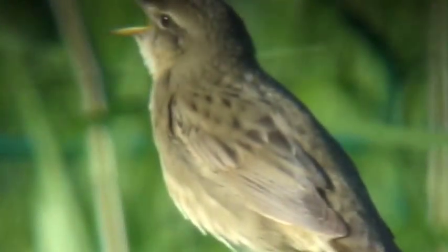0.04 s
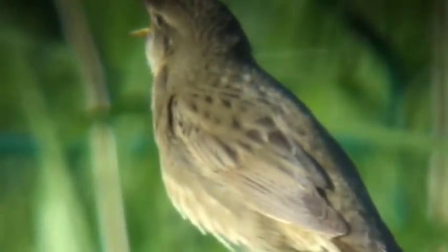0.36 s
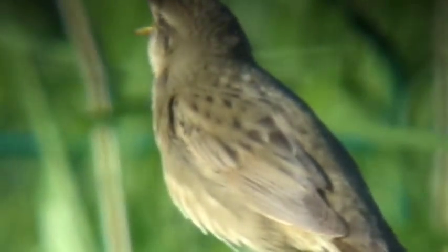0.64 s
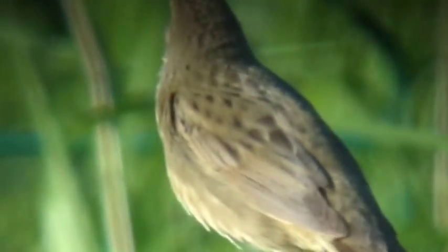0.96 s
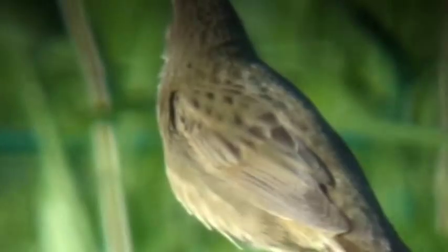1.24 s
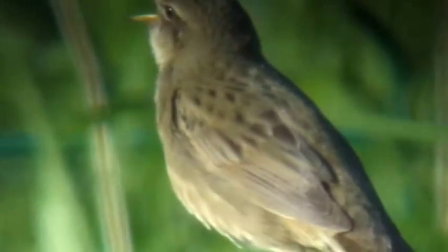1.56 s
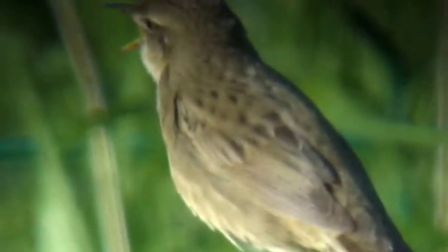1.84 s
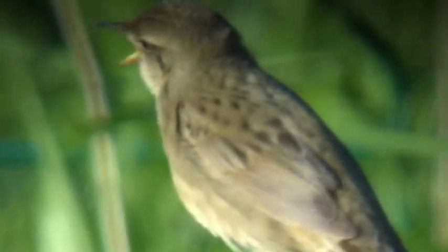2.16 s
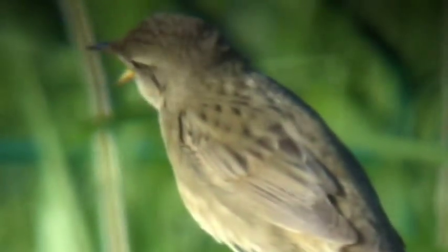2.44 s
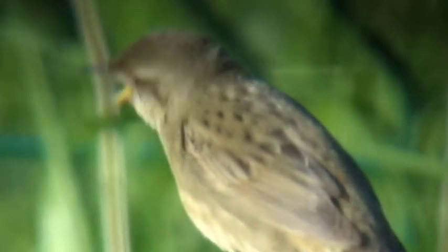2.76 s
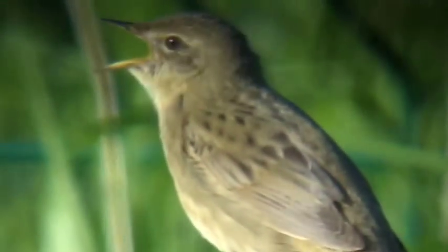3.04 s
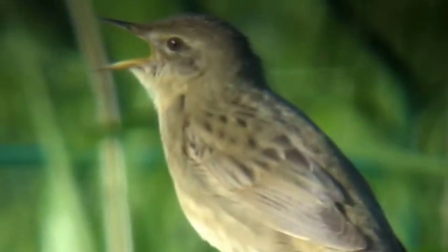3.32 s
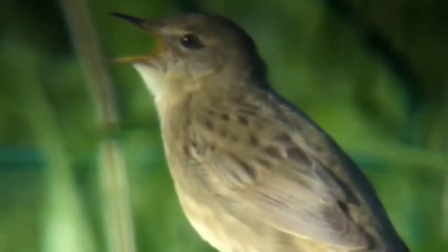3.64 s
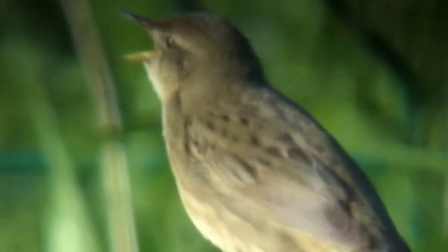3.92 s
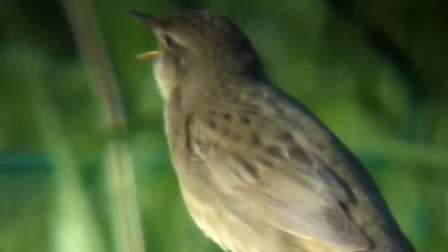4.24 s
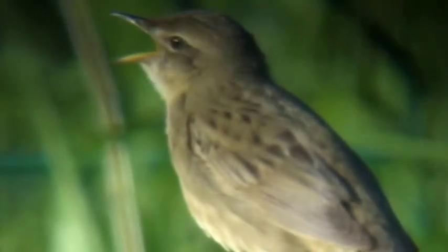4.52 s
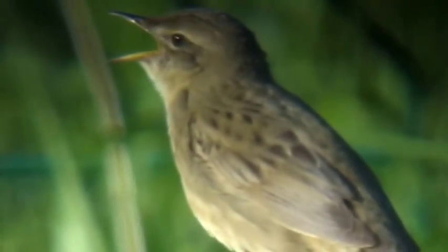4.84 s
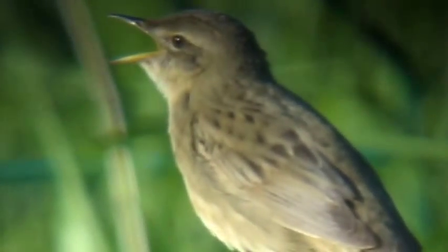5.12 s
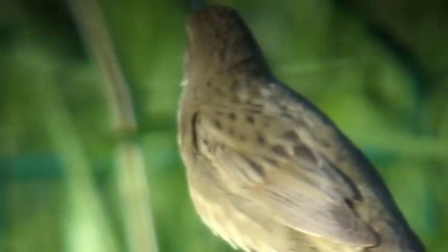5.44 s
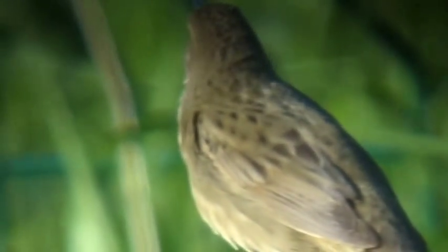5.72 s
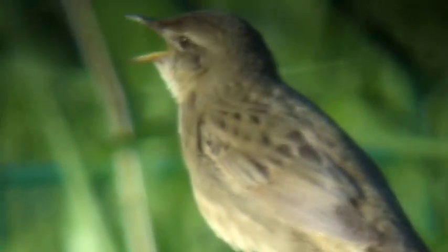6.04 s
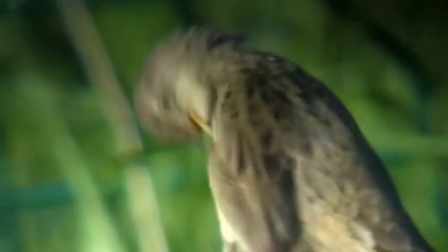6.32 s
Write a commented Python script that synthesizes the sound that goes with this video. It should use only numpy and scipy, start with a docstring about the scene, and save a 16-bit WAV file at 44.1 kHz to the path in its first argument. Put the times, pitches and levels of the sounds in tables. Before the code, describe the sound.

Outdoors among reeds, a nearby small bird keeps up a rapid, high ticking trill, much like an insect. Other birds add faint distant whistles and, about halfway, a brief buzzing call with a sharp chip. One small click sounds near the microphone, and a quiet twitter follows. The trill ends just before a last falling buzz, all over a soft distant rush and faint camera hum.

```python
"""In a reed bed, a grasshopper warbler sings a fast, even trill called a reel: 27 syllables a second.
Its voice box makes each one as a sharp upward tick and a short falling note, and the stems echo them.
Farther off, other small birds whistle, twitter and buzz, and something clicks once near the microphone.
Under it all lie a distant outdoor rush and a camera's low drone, hiss and faint whine."""
import sys
import numpy as np
from scipy import signal
from scipy.fft import rfft, irfft
from scipy.io import wavfile
from scipy.ndimage import uniform_filter1d

SR = 44100
rng = np.random.default_rng(int(sys.argv[2]) if len(sys.argv) > 2 else 0)


def master(y):
    """Save y as 16-bit WAV."""
    cut = np.clip(np.atleast_2d(y).T, -1, 1)
    pcm = np.round(cut * 32767)  # scale
    wavfile.write(sys.argv[1], SR, pcm.astype(np.int16))


N = 290178
TIME = np.arange(N) / SR

# how strong each background noise is, from low to high: frequency_hz, relative_db
RUSH_SPECTRUM = [(30, -40), (200, -14.5), (450, -3), (750, -1), (960, 2), (1200, -2), (1650, -3.5),
                 (2300, -11.5), (4000, -18.5), (7000, -17.5), (16000, -42)]
RUMBLE_SPECTRUM = [(20, -24), (35, -19), (50, -5.5), (63, 1), (83, -2.5), (140, -1), (170, -5),
                   (195, -12.5), (400, -10.5), (900, -66)]
DRONE_SPECTRUM = [(170, -37), (205, -19), (238, -5), (272, 2), (305, -4.5), (338, -19), (390, -13),
                  (440, -29), (700, -52.5)]
HISS_SPECTRUM = [(1000, 0), (5000, -7.5), (9000, 1), (11000, 5.5), (12500, 9.5), (14000, 2), (16000, 4)]
# how the rush swells and sinks: time_s, level_db
RUSH_SWELL = [(0, -58), (1.3, -58), (2.2, -58.5), (3.2, -59), (4.3, -57), (5.1, -59), (6.58, -59)]
# random unevenness in the loudness of the low drone: time_s, level_db
DRONE_FLUTTER = [(0.0, -53), (0.52, -48.5), (0.8, -56.5), (1.22, -48.5), (1.41, -55.5), (1.55, -47),
                 (2.21, -47.5), (2.26, -52), (3.15, -49.5), (3.2, -54.0), (4.89, -50), (5.31, -54),
                 (5.5, -50), (5.73, -57.0), (5.97, -51.0), (6.58, -55)]
# the thin, steady tones of the camera's electronics: pitch_hz, level_db
WHINE_TONES = [(10000, -88), (11000, -84), (11900, -83), (12000, -78), (12100, -84), (13000, -80),
               (13100, -87), (14000, -87)]

# the warbler's pace, steady but for slight hesitations: time_s, syllables_so_far
REEL_PACE = [(0.0023, 0), (1.18, 32), (1.3299, 36), (1.6236, 44), (2.2902, 62), (3.0351, 82), (3.7734, 102),
             (3.8133, 103), (4.3751, 118), (5.1142, 138), (5.3431, 144), (6.1295, 165), (6.2472, 168)]
# how strongly it sings: time_s, level_db
REEL_EFFORT = [(0, -38), (.35, -38.5), (1.25, -35), (2.1, -38), (2.75, -40), (3.1, -39), (3.95, -41.5),
               (4.5, -41), (4.95, -37), (5.3, -39.5), (5.9, -36), (6.25, -42)]
# its overtone (twice the pitch), stronger as the bill opens: time_s, relative_db
REEL_OVERTONE = [(0.0, -22), (0.48, -32.0), (0.78, -25), (2.7, -24), (3.15, -18), (4.56, -29), (5.34, -18),
                 (5.64, -34.0), (6.25, -15.5)]
# the two parts of a syllable: time_from_beat_ms, pitch_hz, relative_db
TICK_SHAPE = [(-1.74, 3850, -26), (-0.92, 4700, -5.5), (-0.86, 6170, 0), (-0.35, 6540, 2), (0.64, 7090, -3),
              (0.92, 8800, -27)]
NOTE_SHAPE = [(9.3, 6140, -24), (10.4, 6040, 1.2), (13.4, 5860, .1), (15.1, 5580, -13)]
# echoes from stems and ground: delay_ms, left_db, right_db
STEM_ECHOES = [(1.257, -20, -14), (5.27, -9.5, -27), (6.25, -32, -16), (31.5, -48, -47)]

# notes of the far whistles and of a twittering bird: start_s, length_s, top_pitch_hz, level_db, shape
WHISTLE_NOTES = [(.24, 0.1, 4350, -67.5, "fall"), (.63, .07, 4240, -74, "fall"),
                 (.875, .135, 3550, -68, "arch"), (1.235, .027, 3600, -74, "fall"),
                 (2.32, .038, 3080, -69, "fall"), (2.65, .12, 4000, -72, "fall"),
                 (2.9, .12, 4000, -72, "fall"), (3.19, 0.1, 3870, -71, "fall"),
                 (3.99, .13, 3990, -72, "fall"), (4.26, .14, 4030, -71, "fall"),
                 (4.51, 0.11, 4080, -69, "fall"), (4.81, 0.09, 4030, -72, "fall")]
TWITTER_NOTES = [(3.378, .047, 2870, -55.5, "rise"), (3.478, .058, 2870, -55, "rise"),
                 (4.793, 0.038, 3010, -63, "arch"), (4.873, 0.042, 3060, -67, "arch"),
                 (4.988, .04, 3120, -67, "arch"), (5.06, 0.032, 3000, -62, "arch"),
                 (5.143, 0.048, 3160, -60.5, "arch"), (5.232, 0.06, 3040, -61, "arch"),
                 (5.336, .06, 2920, -57.5, "arch"), (5.398, 0.049, 2930, -55, "arch"),
                 (5.476, 0.058, 2910, -55.5, "arch"), (5.534, 0.049, 2840, -54, "arch"),
                 (5.603, .1, 2930, -57.5, "double"), (5.734, 0.088, 2950, -54.5, "double"),
                 (5.847, 0.086, 2970, -52, "double"), (5.962, .088, 3020, -53, "double"),
                 (6.077, 0.092, 2970, -53, "double"), (6.192, .088, 3030, -53, "double")]
# buzzing calls (a negative fade grows louder): start_s, length_s, first_pitch_hz, last_pitch_hz,
# level_db, fade_db_per_s, warble_share_of_pitch, first_overtone_db, last_overtone_db
BUZZ_CALLS = [(3.59, .144, 3520, 3490, -37, 22, .07, -32, -32),
              (3.8555, .074, 2760, 2580, -57, -195, .14, 21, -20),
              (6.3215, .198, 4380, 3170, -35.5, 50, .15, -35, -35)]
# one sharp chip from another small bird: start_s, length_s, peak_time_s
CHIP_TIMING = (3.777, .058, 3.8045)

# the two knocks that make the click: start_s, level_db, hardness_db
CLICK_CONTACTS = [(4.5825, -33.5, -4), (4.5836, -30, 3)]
# the tones they set ringing (ring_s is the time to fade by 60 dB): pitch_hz, relative_db, ring_s
CLICK_TONES = [(932, -4, 0.033), (1040, -5.5, 0.026), (1013, -16, 0.11), (1455, -6.5, 0.014),
               (1970, -9, 0.0095), (2350, -8, 0.033), (3220, -21, 0.0063)]


def from_db(db):
    """Turn decibels into a number to multiply a sound by."""
    return 10 ** (np.asarray(db) / 20)


def add(out, start_s, sound):
    """Mix a short sound into a track, dropping whatever sticks out past the ends."""
    at = round(start_s * SR) + np.arange(len(sound))
    inside = (at >= 0) & (at < N)
    out[at[inside]] += sound[inside]


def noise(spectrum, likeness):
    """Stereo noise shaped by a spectrum; a likeness of 1 makes left and right the same."""
    hz, db = np.transpose(spectrum)
    gain = from_db(np.interp(np.log(np.fft.rfftfreq(N, 1 / SR) + 1), np.log(hz), db))
    middle, side = irfft(rfft(rng.standard_normal((2, N))) * gain, N)
    both = np.sqrt(1 + likeness) * middle + np.sqrt(1 - likeness) * np.array([side, -side])
    return both / both.std()


def outdoor_rush():
    """A wide, distant rush that swells gently, a little to the right."""
    swell = from_db(np.interp(TIME, *np.transpose(RUSH_SWELL)) + 3.5)
    return swell * noise(RUSH_SPECTRUM, likeness=.31) * from_db([[-2], [2]])


def camera_noise():
    """The camera rumbles, drones and hisses, and its electronics whine."""
    rumble = from_db(-55.5) * noise(RUMBLE_SPECTRUM, likeness=.99)
    flutter = from_db(np.interp(TIME, *np.transpose(DRONE_FLUTTER)) + .36)
    drone = flutter * noise(DRONE_SPECTRUM, likeness=.96) * from_db([[-.5], [.5]])
    hiss = from_db(-66) * noise(HISS_SPECTRUM, likeness=1)
    whine = sum(np.sqrt(2) * from_db(db) * np.sin(2 * np.pi * hz * TIME) for hz, db in WHINE_TONES)
    return rumble + drone + hiss + whine


def voice_box(hz, level_db, overtones_db):
    """A bird's gliding whistle, plus overtones: tones at whole multiples of its pitch."""
    phase = 2 * np.pi * (np.cumsum(hz) / SR + rng.random())
    overtones = sum(from_db(db) * np.sin(k * phase) * (k * hz < SR / 2)
                    for k, db in enumerate(overtones_db, 2))
    return from_db(level_db) * (np.sin(phase) + overtones)


def strokes(shape, beats, levels_db, overtones_db, pitch_spread, spread_db):
    """One tiny whistle on every beat, never quite the same twice."""
    out = np.zeros(N)
    times_ms, pitches_hz, shape_db = np.transpose(shape)
    ms = np.arange(times_ms[0], times_ms[-1], 1000 / SR)
    hz = np.interp(ms, times_ms, pitches_hz)
    swell_db = np.interp(ms, times_ms, shape_db)
    chances = rng.standard_normal((len(beats), 2))
    for beat, db, overtone_db, (higher, louder) in zip(beats, levels_db, overtones_db, chances):
        pitch = hz * (1 + pitch_spread * higher)
        stroke = voice_box(pitch, swell_db + db + spread_db * louder, [overtone_db])
        add(out, beat + times_ms[0] / 1000, stroke)
    return out


def lean_left(sound, hz, width_hz, depth_db):
    """Make stereo: in one narrow range of pitch, the left microphone hears more than the right."""
    lean_db = depth_db * np.exp(-.5 * ((np.fft.rfftfreq(N, 1 / SR) - hz) / width_hz) ** 2)
    return irfft(rfft(sound) * from_db([lean_db / 2, -lean_db / 2]), N)


def reed_scatter(sound, tail_db, ring_s):
    """Countless stems scatter the sound into a short, blurred tail, different on each side."""
    t = TIME[:SR // 2]
    tail = rng.standard_normal((2, len(t))) * from_db(-60 * t / ring_s)
    tail /= np.sqrt(np.sum(tail ** 2, axis=1, keepdims=True))
    return sound + from_db(tail_db) * signal.fftconvolve(sound, tail, axes=1)[:, :N]


def warbler(jitter_s=.0002):
    """Tick and note take turns all through the song, and nearby stems throw them back."""
    times_s, sung = np.transpose(REEL_PACE)
    beats = np.interp(np.arange(round(sung[-1]) + 1), sung, times_s)
    beats += jitter_s * rng.standard_normal(len(beats))
    effort_db = np.interp(beats, *np.transpose(REEL_EFFORT))
    overtone_db = np.interp(beats, *np.transpose(REEL_OVERTONE))
    ticks = strokes(TICK_SHAPE, beats, effort_db, overtone_db + .7, pitch_spread=.009, spread_db=1.08)
    notes = strokes(NOTE_SHAPE, beats, effort_db, overtone_db - 1.5, pitch_spread=.005, spread_db=.8)
    out = lean_left(ticks + notes, hz=5840, width_hz=270, depth_db=4.5)
    echo = from_db(-1.5) * ticks + from_db(1) * notes   # the longer note bounces back better
    for delay_ms, left_db, right_db in STEM_ECHOES:
        lag = round(delay_ms * SR / 1000)
        out += from_db([[left_db], [right_db]]) * np.pad(echo, (lag, 0))[:N]
    return reed_scatter(out, tail_db=-11.5, ring_s=.29)


def waver(hz, share, smooth_samples):
    """A living voice never holds its pitch exactly."""
    jitter = uniform_filter1d(rng.standard_normal(len(hz)), smooth_samples) * np.sqrt(smooth_samples)
    return hz * (1 + share * jitter)


def melody(shape, along, flatness=3.2):
    """Pitch as a share of the top pitch, as a note goes along from 0 to 1."""
    if shape == "rise":
        return 1 - .14 * (1 - along) ** flatness
    if shape == "fall":
        return 1 - .29 * along ** .8
    arch = 1 - .38 * np.abs(2 * along - 1) ** flatness
    if shape == "arch":
        return arch
    double = arch - .2 * np.exp(-((along - .52) / .1606) ** 2)   # a dip makes two humps
    return double / double.max()


def sliding_notes(notes, overtones_db, fade_power, db_per_octave, unsteady):
    """Whistled notes that fade in and out, with their loudness tied to their sliding pitch."""
    out = np.zeros(N)
    for start_s, length_s, top_hz, db, shape in notes:
        bend = melody(shape, np.linspace(0, 1, round(length_s * SR)))
        hz = waver(top_hz * bend, unsteady, smooth_samples=90)
        bend_db = db_per_octave * np.log2(bend)
        # where the main tone weakens, the overtones stand out more
        note = voice_box(hz, db + bend_db, [level - bend_db / 2 for level in overtones_db])
        add(out, start_s, note * np.hanning(len(hz)) ** fade_power)
    return out


def far_whistles():
    """Faint, almost pure whistles, most of them falling."""
    return sliding_notes(WHISTLE_NOTES, [-30], fade_power=.24, db_per_octave=-8, unsteady=.02)


def twitter(overtones_db=(.5, -15, -12.5, -28)):
    """Quick, bright notes; the air pressure that lifts the bird's pitch also makes it louder."""
    return sliding_notes(TWITTER_NOTES, overtones_db, fade_power=.14, db_per_octave=18, unsteady=.0063)


def throat(hz, db, overtone_db, limit_hz=3900, loss_db_per_octave=55):
    """A call that swells and dies away; the throat weakens it where its pitch passes a limit."""
    pitch = waver(hz, share=.011, smooth_samples=60)
    octaves_over = np.clip(np.log2(pitch / limit_hz), 0, None)
    call = voice_box(pitch, db - loss_db_per_octave * octaves_over, [overtone_db])
    return call * np.hanning(len(hz)) ** .29


def buzzes(glide_s=.082, fast_hz=92, slow_hz=70, slowing_s=.09):
    """The pitch glides down while a fast warble swings it up and down, which sounds like a buzz."""
    out = np.zeros(N)
    for start_s, length_s, first_hz, last_hz, db, fade_db_per_s, depth, *overtone_ends_db in BUZZ_CALLS:
        t = TIME[:round(length_s * SR)]
        centre_hz = last_hz + (first_hz - last_hz) * np.exp(-(t / glide_s) ** 2)
        warble_hz = slow_hz + (fast_hz - slow_hz) * np.exp(-t / slowing_s)
        turn = 2 * np.pi * np.cumsum(warble_hz) / SR
        swing = np.cos(turn) + .22 * np.sin(2 * turn)   # rises slowly, drops quickly
        swing *= np.hanning(len(t)) ** .2   # eases in and out
        swing *= (centre_hz / first_hz) ** 1.7   # narrows as the voice drops
        pitch = centre_hz * (1 + depth * swing)
        overtone_db = np.linspace(*overtone_ends_db, len(t))
        add(out, start_s, throat(pitch, db - fade_db_per_s * t, overtone_db))
    return out


def chip(low_hz=3300, peak_hz=4650, last_hz=2760, climb_s=.008, drop_s=.0068):
    """Another small bird flicks its pitch up to a sharp peak and lets it drop."""
    start_s, length_s, peak_s = CHIP_TIMING
    out = np.zeros(N)
    from_peak_s = TIME[:round(length_s * SR)] + start_s - peak_s
    climb = low_hz + (peak_hz - low_hz) * np.exp(-np.abs(from_peak_s) / climb_s)
    drop = last_hz + (peak_hz - last_hz) * np.exp(-np.abs(from_peak_s) / drop_s)
    pitch = np.where(from_peak_s < 0, climb, drop)
    add(out, start_s, throat(pitch, db=-43, overtone_db=-32))
    return out


def place(sound, left_db, lag_ms=0):
    """Make stereo: a negative left_db favours the right side; lag_ms delays the right side."""
    delay = np.exp(-2j * np.pi * np.fft.rfftfreq(N, 1 / SR) * lag_ms / 1000)
    right = irfft(rfft(sound) * delay, N)
    return np.array([sound, right]) * from_db([[left_db / 2], [-left_db / 2]])


def other_birds():
    """The other birds are heard through the reeds, farther off and to the right of the warbler."""
    twittering = place(twitter(), left_db=-.5, lag_ms=.0086)
    whistling = place(far_whistles(), left_db=-7)
    out = reed_scatter(twittering, tail_db=-11, ring_s=.23)
    buzzing = place(buzzes() + chip(), left_db=-.7, lag_ms=.028)
    out += reed_scatter(buzzing, tail_db=-12.5, ring_s=.27)
    return out + reed_scatter(whistling, tail_db=-1, ring_s=.25)


def click(low_cut_hz=840, snap_db=-13, snap_s=.012):
    """Two quick knocks snap and briefly ring an object too small to give off bass."""
    out, t = np.zeros(N), TIME[:SR // 5]
    ring = sum(from_db(db - 60 * t / ring_s) * np.sin(2 * np.pi * hz * t)
               for hz, db, ring_s in CLICK_TONES)
    for start_s, db, hardness_db in CLICK_CONTACTS:
        snap = from_db(snap_db + hardness_db - 60 * t / snap_s) * rng.standard_normal(len(t))
        add(out, start_s, from_db(db) * (ring + snap))
    out = signal.sosfilt(signal.butter(6, low_cut_hz, "high", fs=SR, output="sos"), out + 1e-18)
    return reed_scatter(place(out, left_db=-.5, lag_ms=.08), tail_db=-13, ring_s=.12)


def scene():
    """Everything heard from the edge of the reed bed."""
    return warbler() + other_birds() + click() + outdoor_rush() + camera_noise()


def record(dry):
    """The recorder steeply cuts off the very highest sounds."""
    cutoff_hz = 15800
    return signal.sosfilt(signal.ellip(12, .1, 70, cutoff_hz, fs=SR, output="sos"), dry)


dry = scene()
out = record(dry)
master(out)
```